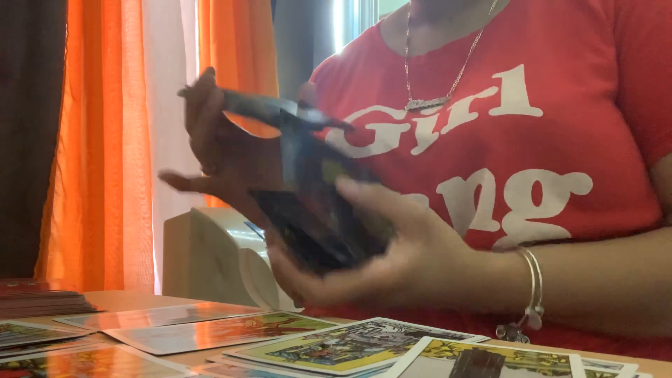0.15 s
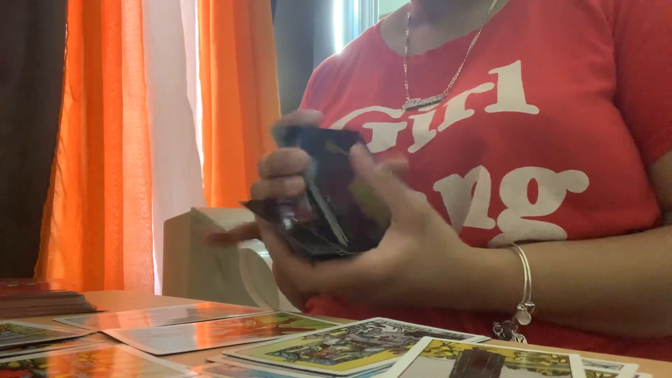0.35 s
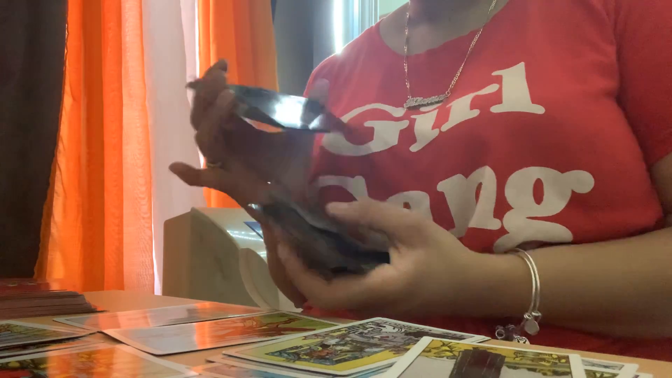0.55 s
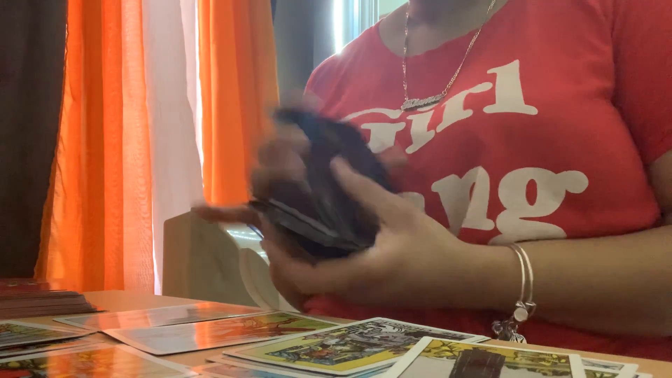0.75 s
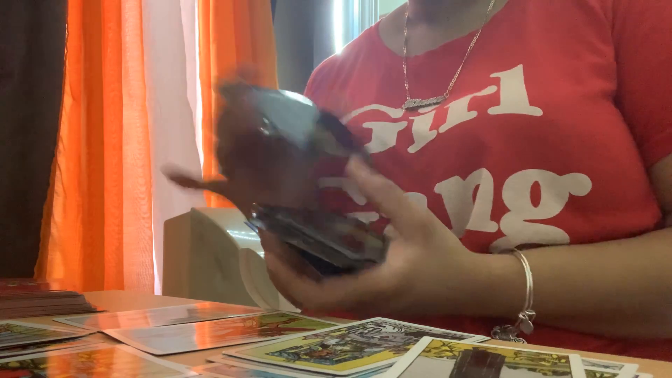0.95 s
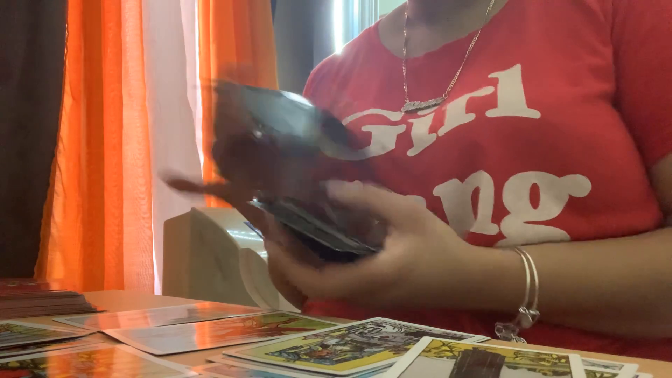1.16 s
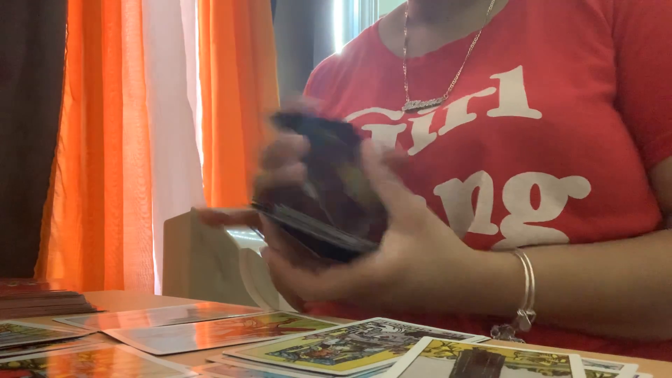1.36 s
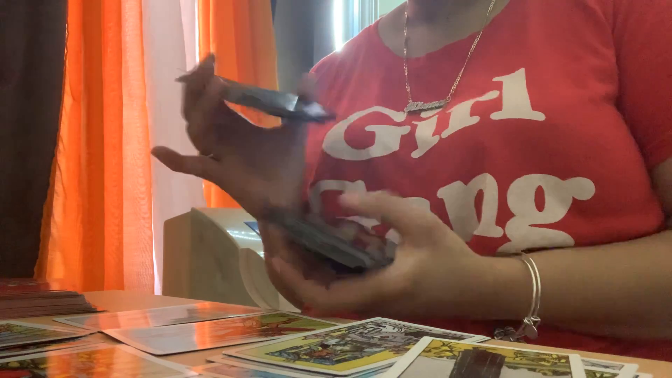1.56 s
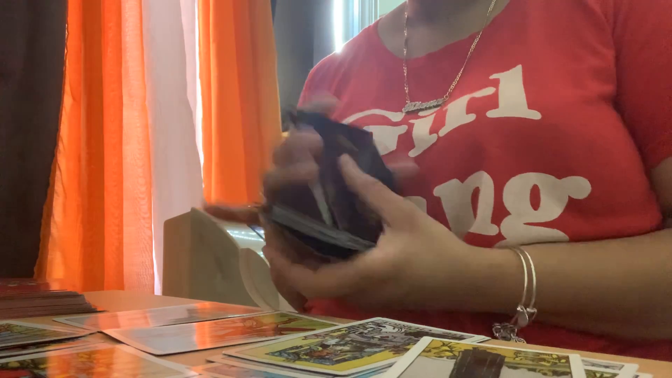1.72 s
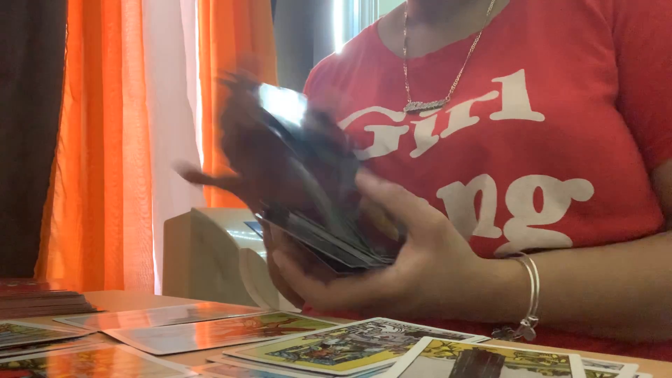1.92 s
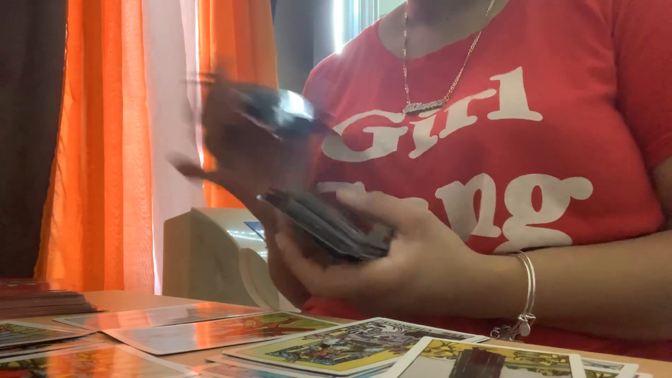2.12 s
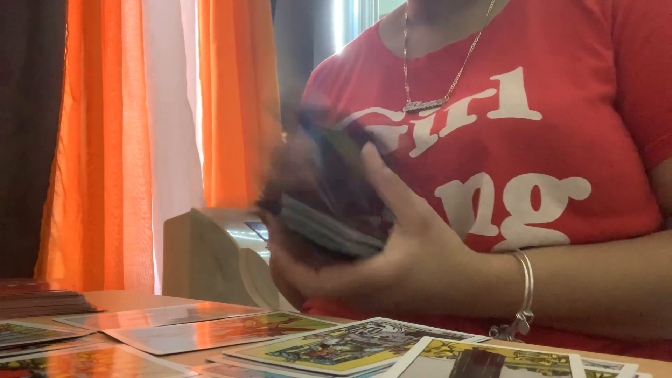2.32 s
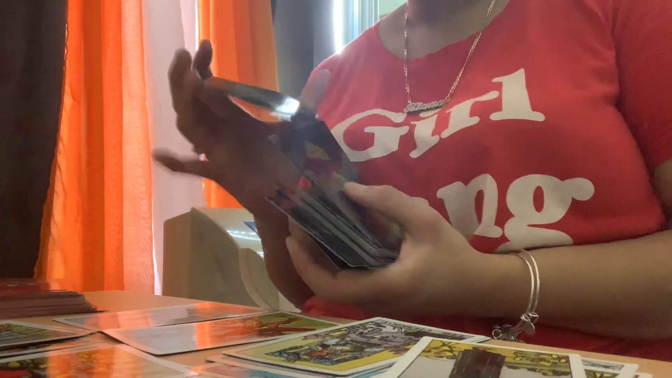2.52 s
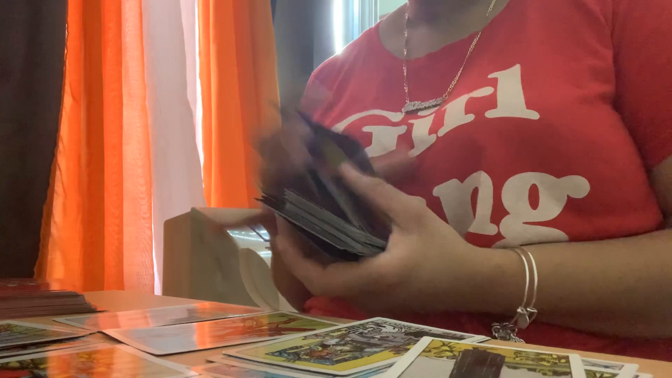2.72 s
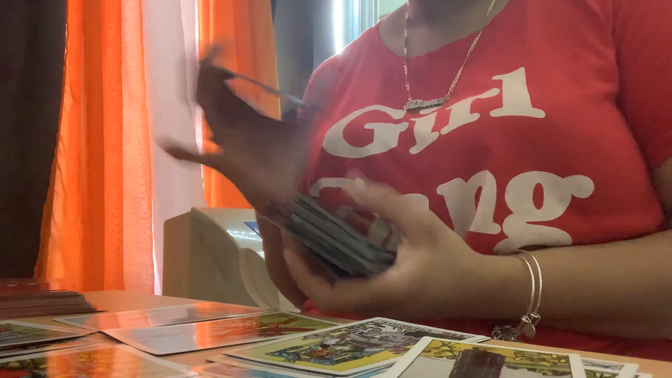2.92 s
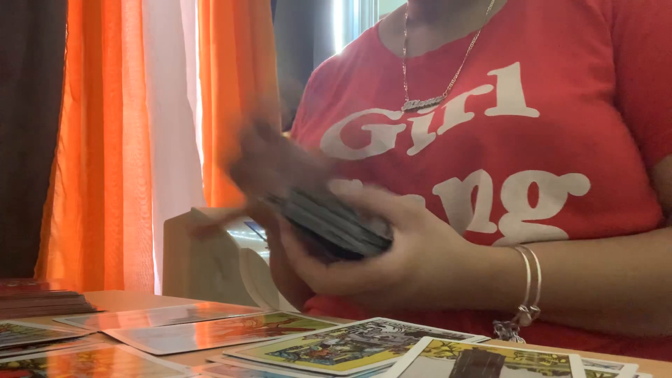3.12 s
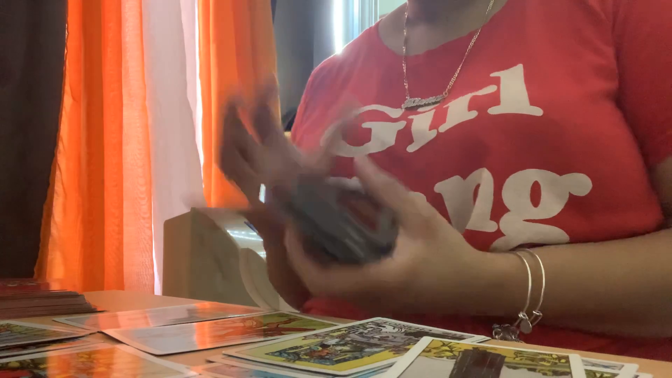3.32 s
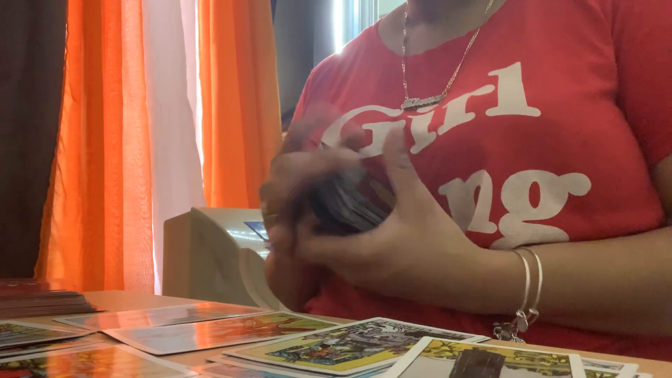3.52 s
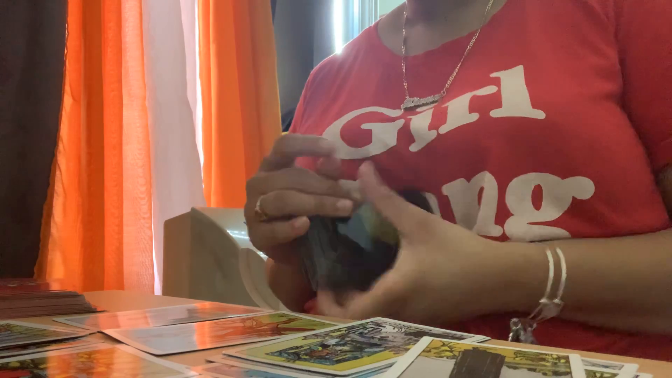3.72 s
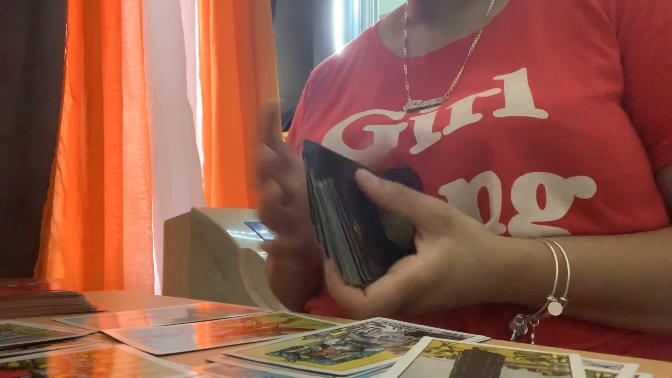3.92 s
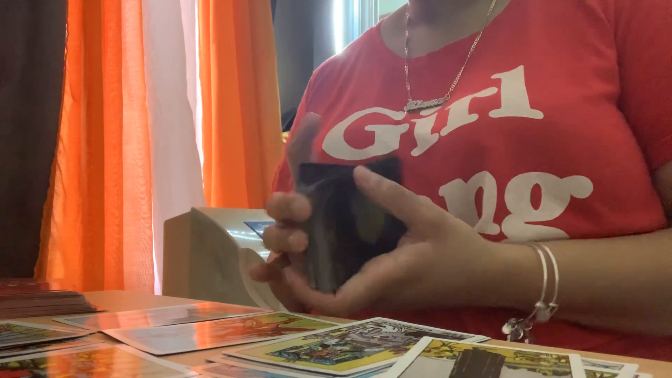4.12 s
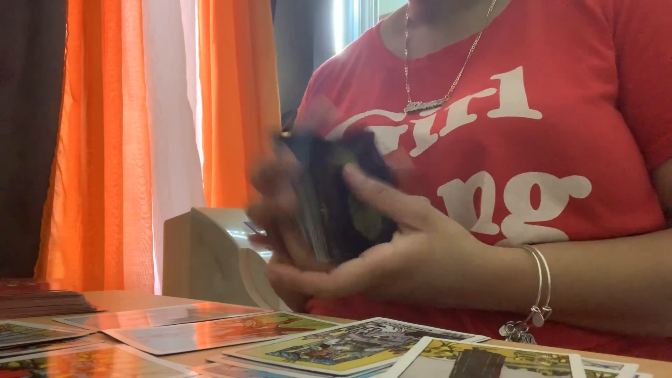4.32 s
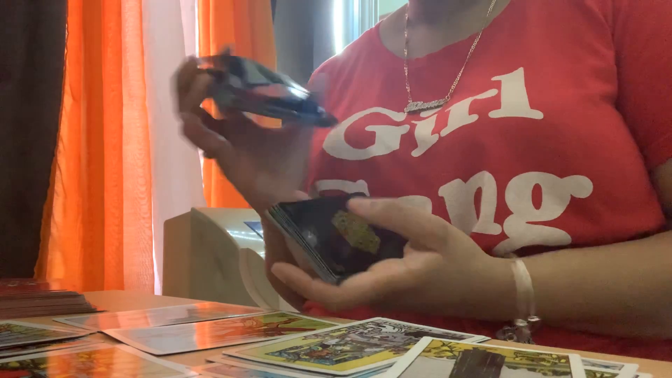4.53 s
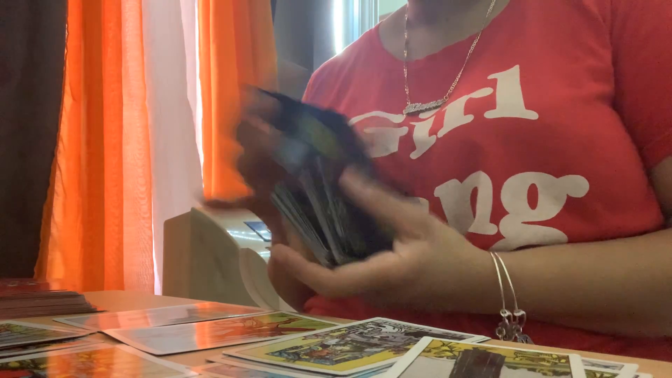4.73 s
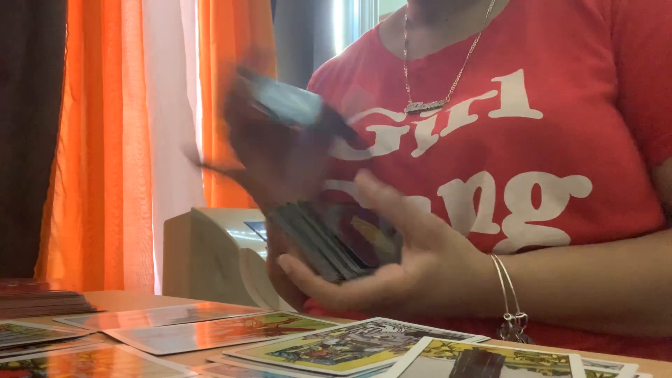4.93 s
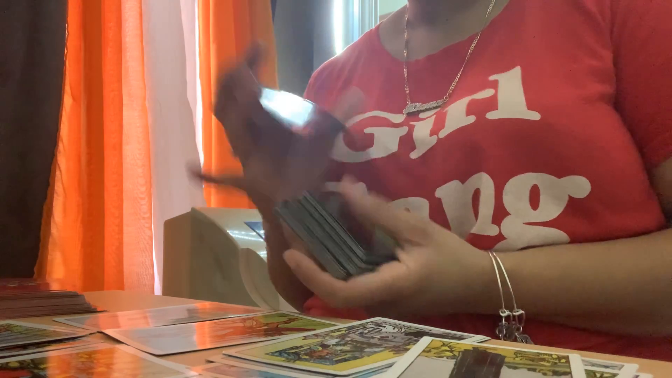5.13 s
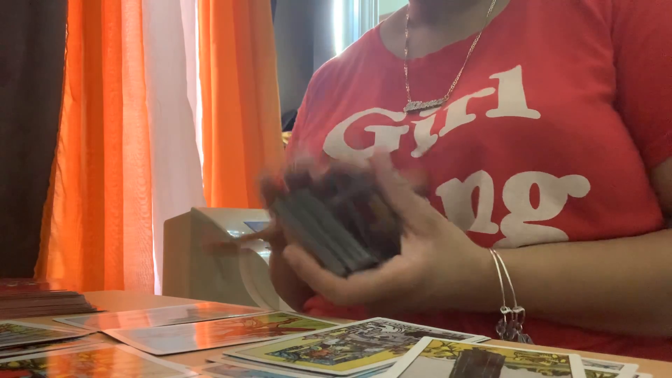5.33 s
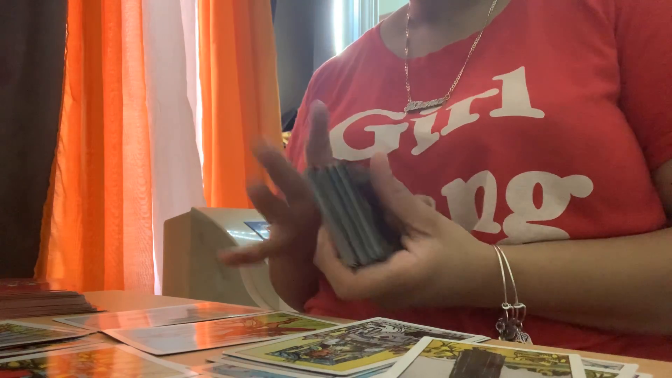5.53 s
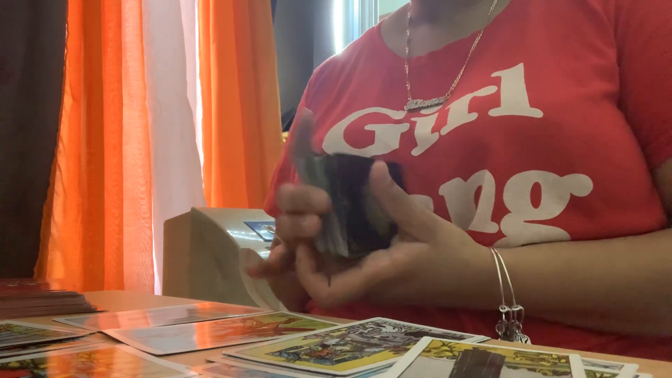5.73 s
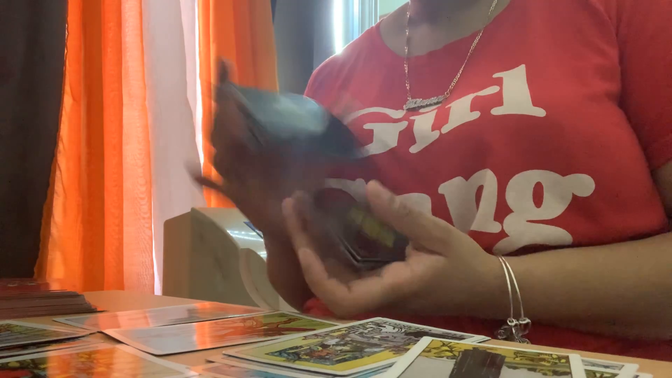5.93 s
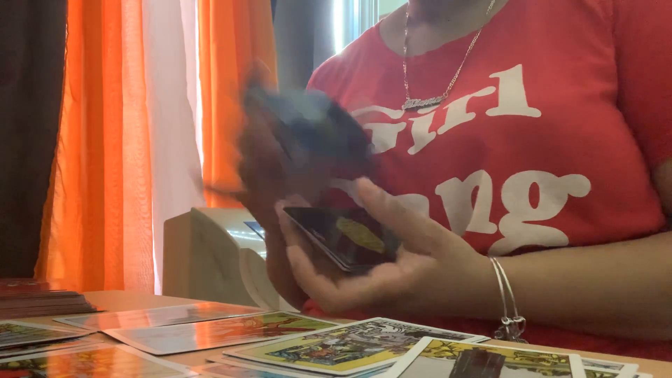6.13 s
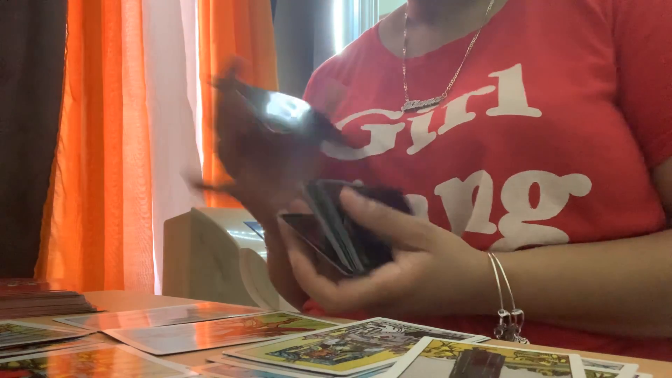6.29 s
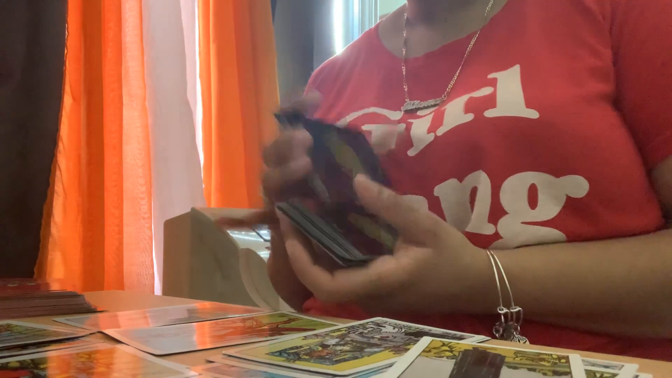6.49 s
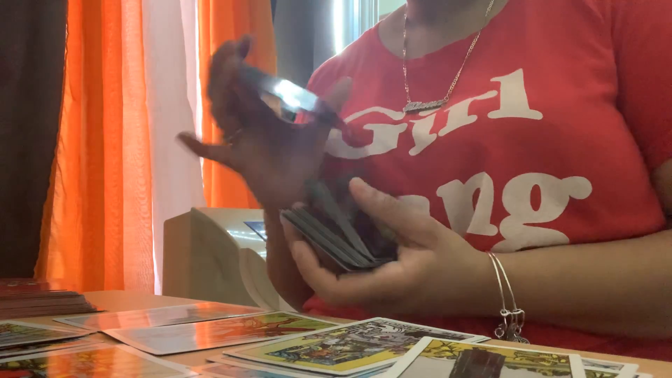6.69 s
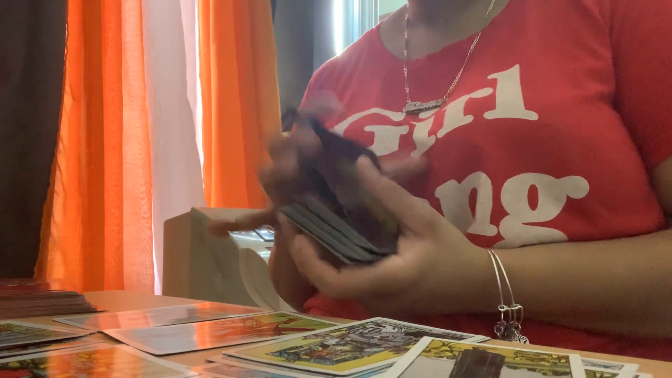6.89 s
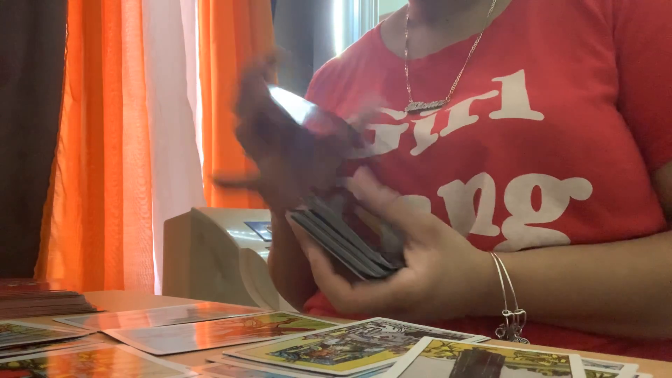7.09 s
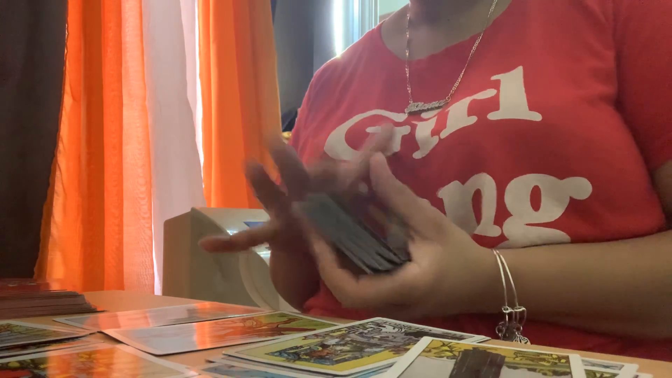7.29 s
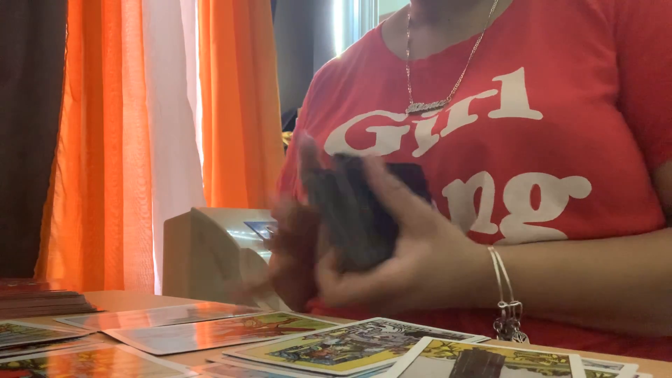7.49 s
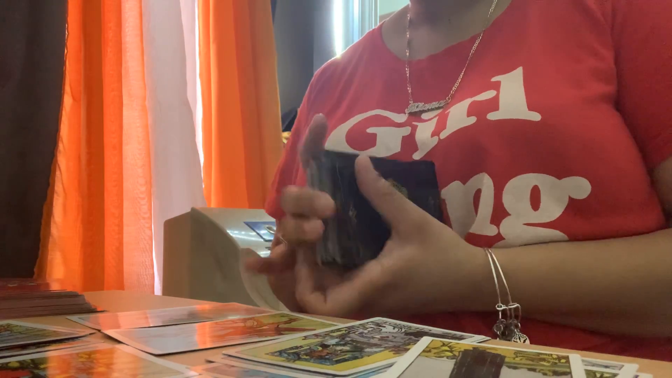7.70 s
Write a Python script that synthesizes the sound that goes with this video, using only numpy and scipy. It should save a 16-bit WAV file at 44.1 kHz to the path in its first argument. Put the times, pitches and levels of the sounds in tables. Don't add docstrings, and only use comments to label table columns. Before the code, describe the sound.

Irregular overhand shuffling, heard close and dry with a short indoor tail. First comes a busy, louder run of gritty slides, sharp card slaps and woody knocks that ring for an instant. The hands then slow, leaving faint ticks and rubs. A sparser second round brings clicks, snaps and lighter slaps, fading to small rustles. Soft arm rumble and steady faint hiss lie underneath.

```python
import sys
import numpy as np
from scipy import signal
from scipy.fft import rfft, irfft
from scipy.io import wavfile
from scipy.ndimage import uniform_filter1d

SR = 44100
rng = np.random.default_rng(int(sys.argv[2]) if len(sys.argv) > 2 else 0)


def master(y):
    cut = np.clip(np.atleast_2d(y).T, -1, 1)
    pcm = np.round(cut * 32767)
    wavfile.write(sys.argv[1], SR, pcm.astype(np.int16))


def ratio(d):
    e = np.asarray(d, float) / 20
    return 10 ** e


N = 341775

# frequency in Hz, level in dB per Hz.
CRACK_SPECTRUM = [(1500, -6), (3000, 3), (5000, -1.5), (8000, -7), (12000, -13), (16000, -7.5)]


def rms_one(x):
    return x / np.sqrt(np.mean(x ** 2) + 1e-20)


def at_hz(points, hz):
    points = np.array(points)
    return np.interp(np.log(hz), np.log(points[:, 0]), points[:, 1])


def coloured(x, spectrum):
    hz = np.arange(len(x) // 2 + 1) * SR / len(x) + 1
    return irfft(rfft(x) * ratio(at_hz(spectrum, hz)), len(x))


def band(x, low_hz, high_hz):
    return signal.sosfilt(signal.butter(2, [low_hz, high_hz], "band", fs=SR, output="sos"), x)


def drift(rate_hz):
    r = np.exp(-2 * np.pi * rate_hz / SR)
    return rms_one(signal.lfilter([1], [1, -2 * r, r * r], rng.standard_normal(N)))


def burst(t, touch_s):
    return t / touch_s * np.exp(1 - t / touch_s)


def falling(t, hz, fall, settle_s):
    return np.sin(2 * np.pi * hz * (t + fall * settle_s * (1 - np.exp(-t / settle_s))))


def add_at(out, start_s, sound):
    start = round(start_s * SR)
    out[start:start + len(sound)] += sound


def hands(t):
    # share of the stroke 0-1, rasp in dB re peak, flexing in dB re rasp,
    # sheen in dB re the stroke's own.
    drop_shape = [(0, -25, 0.5, -7), (.55, 2, -26.5, 0), (1, -5, -13.5, 4.5)]
    push_shape = [(0, -18, -4.5, -3), (.5, -11, -13.5, 5), (1, -1, -11.5, -1.5)]
    glide_shape = [(0, -17, -4.5, -2.5), (.3, -6, -16, -0.5), (1, 1.5, -16, -0.5)]
    rub_shape = [(0, -11, 2, 0.004), (.55, -1, -16.5, 0.00093), (1, -12.5, 0.5, 0)]
    settle_shape = [(0, -3.5, 11.5, 0.014), (.4, -2.5, -4, 0), (1, -9, 2, 0)]
    fan_shape = [(0, -2, -2, 1.5), (.5, 2, -16, -2.5), (1, -6.5, -11, -5)]
    long_shape = [(0, -15, -3.5, -12), (.3, 2, -31, -3), (1, -0.5, -17.5, 0.5)]
    # start and end in seconds, peak rasp in dB,
    # resonance of the air gap between packets in Hz, sheen of the coating in dB re rasp.
    drops = [
        (0.772, 0.8515, -38, 5940, -2),
        (1.082, 1.183, -37.5, 5360, -1),
        (2.719, 2.781, -36.5, 5500, 0.5),
    ]
    pushes = [(1.357, 1.435, -61.5, 4759, -4), (1.44, 1.501, -40, 5330, 8), (1.692, 1.733, -52, 3400, -7),
              (1.801, 1.809, -36, 5160, 4.5), (4.374, 4.407, -49, 2470, -13.5), (4.99, 5.037, -59, 3100, 1),
              (5.328, 5.348, -48.5, 2500, -1), (6.176, 6.218, -57.5, 5083, 3)]
    glides = [(4.285, 4.385, -59.5, 2600, 1.5), (2.597, 2.68, -50, 3100, -11),
              (3.42, 3.478, -63.5, 2700, -7.5), (3.5, 3.562, -49.5, 2700, -11),
              (5.805, 5.895, -65, 5000, -3), (0.394, 0.504, -47, 4000, -4), (4.0, 4.8, -64.5, 1400, -1.5),
              (1.73, 1.795, -50, 3600, 7), (4.66, 4.712, -61, 3000, 6.5), (6.505, 6.56, -63.5, 1900, 2)]
    rubs = [(0.006, 0.16, -47.5, 4930, -5), (0.331, 0.393, -46.5, 1820, -16),
            (1.912, 2.014, -45.5, 3000, -10), (2.383, 2.451, -48, 3000, -7),
            (2.694, 2.718, -38.5, 3080, -14), (3.095, 3.148, -38.5, 1910, -5),
            (3.664, 3.763, -51, 2520, -6), (4.21, 4.23, -72, 1590, -5), (4.705, 4.749, -46.5, 2080, -16),
            (4.872, 4.923, -67, 4720, -6), (5.557, 5.646, -65, 4240, -19), (5.682, 5.716, -66.5, 2330, -11),
            (6.875, 6.893, -57, 4000, 2), (6.894, 6.926, -51.5, 3000, -9), (7.465, 7.506, -58.5, 3160, -14),
            (7.529, 7.565, -56, 3080, -6.5), (7.595, 7.68, -57, 3450, -20),
            (7.651, 7.692, -55.5, 4500, -12), (7.687, 7.73, -70.5, 3130, -12),
            (3.343, 3.422, -71.5, 2840, -11.5), (1.027, 1.072, -58.5, 2390, -7)]
    settles = [(0.0, 0.018, -40, 3700, -14), (0.26, 0.313, -54, 1720, -16), (0.515, 0.594, -49, 1600, -20),
               (0.693, 0.734, -50, 3120, -15.5), (1.171, 1.21, -47, 1530, -3),
               (1.498, 1.551, -49.5, 1420, -6), (1.824, 1.893, -49, 2080, -4), (2, 2.034, -44.5, 2330, -6),
               (7.206, 7.252, -47.5, 1850, -8), (3.763, 3.834, -62, 2730, -7),
               (3.917, 3.953, -75, 2320, -25), (4.437, 4.49, -84, 5180, -16.5),
               (4.78, 4.787, -60, 4670, -12.5), (5.351, 5.4, -50.5, 1790, -4.5),
               (5.969, 5.975, -65.5, 1690, -13), (6.97, 6.997, -56.5, 1690, -12),
               (2.351, 2.4, -60, 2410, 1), (3.04, 3.1, -53.5, 3140, -2.5), (0.761, 0.79, -50.5, 5450, -13),
               (3.604, 3.674, -63, 2770, 1), (1.067, 1.094, -46.5, 1590, -15)]
    fans = [(2.437, 2.52, -55, 2360, 4), (3.557, 3.605, -46, 2040, -8), (6.552, 6.636, -51, 3020, -4),
            (5.039, 5.068, -38.5, 5340, 1), (6.223, 6.253, -32, 3050, -6), (6.854, 6.875, -45, 4200, 1.5)]
    longs = [
        (2.057, 2.102, -38, 9000, 0.0067),
    ]
    # shape, strokes, strength of the gap resonance in dB, its slide over the stroke in octaves.
    kinds = [(drop_shape, drops, 2.66, 0.0053), (glide_shape, glides, 7.2, 0.15),
             (push_shape, pushes, 5.0, 0.05), (rub_shape, rubs, 4.4, 0.05),
             (settle_shape, settles, 4.4, -0.05), (fan_shape, fans, 2.9, -0.1), (long_shape, longs, 11, 0.83)]
    release_db_per_s = 697
    strokes = sorted((*row, shape, *gap) for shape, rows, *gap in kinds for row in rows)
    controls = np.zeros((5, len(t))) + [[-120], [0], [0], [3000], [0]]
    for start, end, rasp_db, gap_hz, sheen_db, shape, gap_db, slide in strokes:
        on = t >= start
        share, *columns = np.transpose(shape)
        moments = start + share * (end - start)
        for k, (column, own_db) in enumerate(zip(columns, (rasp_db, 0, sheen_db))):
            controls[k, on] = np.interp(t[on], moments, column) + own_db
        controls[3, on] = gap_hz * 2 ** (slide * np.interp(t[on], [start, end], [-.5, .5]))
        controls[4, on] = gap_db
        controls[0, on] -= release_db_per_s * np.maximum(t[on] - end, 0)
    return controls


def slides(patchy_db=2.5, grit=0.51, gap_octaves=0.27, chatter_db=1.0):
    # frequency in Hz, level in dB per Hz.
    friction_spectrum = [(180, -56), (300, -18.5), (1430, -8), (4370, -5), (7500, -5), (9200, -7),
                         (14500, -3.5), (16000, -7.5)]
    step = 32
    t = np.arange(0, N, step) / SR
    rasp_db, flex_db, sheen_db, gap_hz, gap_db = hands(t)
    grains = (rng.random((2, N)) < 1500 / SR) * rng.standard_normal((2, N)) * 5.4
    friction = rng.standard_normal((2, N)) + grit * grains
    edges = 280 * 2 ** np.arange(0, 6.1, 1 / 4)
    patches = rms_one(uniform_filter1d(rng.standard_normal((len(edges), len(t))), size=30))
    patches = rms_one(uniform_filter1d(uniform_filter1d(patches, size=20), size=3, axis=0))
    out = 0
    for k, (low, high) in enumerate(zip(edges, edges[1:])):
        hz = np.sqrt(low * high)
        dull = at_hz([(900, 0.92), (2600, 0.0082)], hz)
        bright = at_hz([(7000, 0.033), (11000, 0.87)], hz)
        gap = gap_db * np.exp(-(np.log2(hz / gap_hz) / gap_octaves) ** 2)
        db = at_hz(friction_spectrum, hz) + dull * (flex_db + 15.5) + bright * sheen_db
        db = db + gap + patchy_db * patches[k]
        out = out + np.repeat(ratio(db), step)[:N] * band(friction[k % 2], low, high)
    pressure = signal.lfilter([.01], [1, -.99], np.repeat(ratio(rasp_db), step)[:N])
    return out * pressure * ratio(chatter_db * drift(120) + 5.5)


def slaps(touch_ms=1.71):
    # start in seconds, edge crack peak in dB, knock peak in dB,
    # knock pitch in Hz, palm thump peak in dB.
    first_round = [(0.2645, -32.5, -50, 1550, -59), (0.3484, -41, -45.5, 740, -52.5),
                   (0.3655, -29, -44, 930, -51.5), (0.5191, -22.5, -36.5, 765, -43.5),
                   (0.691, -33.5, -44, 1540, -82), (0.7612, -33, -45, 1800, -56),
                   (0.8496, -62, -43.5, 1540, -45), (1.067, -20, -33, 804, -43),
                   (1.1695, -27, -36, 740, -49.5), (1.4135, -31.5, -56, 860, -48),
                   (1.499, -23, -29.5, 758, -36), (1.7231, -29, -56, 680, -45),
                   (1.8125, -16.5, -32, 890, -75), (1.9959, -23, -40.5, 846, -77),
                   (2.3811, -21.5, -51, 730, -44.5), (2.4327, -32, -48, 640, -49),
                   (2.7888, -34.5, -36, 1616, -45.5), (3.0745, -31.5, -45, 1740, -60.5),
                   (3.0906, -19, -44.5, 1590, -72), (3.1417, -41, -38.5, 916, -50),
                   (3.1505, -48, -36.5, 680, -38)]
    loose_round = [(3.5658, -31, -37.5, 851, -73), (3.575, -30, -40, 876, -55),
                   (3.832, -48, -59, 427, -58.5), (4.4214, -49, -63, 688, -82), (4.728, -28, -49, 870, -53),
                   (4.7682, -56, -41, 886, -49), (5.068, -42, -40.5, 1650, -43.5),
                   (5.3503, -25.5, -46, 1950, -60.5), (6.2405, -27, -41.5, 690, -46),
                   (6.6008, -29.5, -52, 1120, -56), (6.981, -34.5, -52, 1630, -71),
                   (7.2089, -27, -39.5, 1850, -48.5), (7.227, -27.5, -44, 1670, -55.5)]
    rows = first_round + loose_round
    t, touch = np.arange(round(.1 * SR)) / SR, touch_ms / 1000
    cracks, knocks = np.zeros((2, N + len(t)))
    noises = rng.standard_normal((len(rows), len(t)))
    for (start, crack_db, knock_db, hz, thump_db), noise in zip(rows, noises):
        add_at(cracks, start, ratio(crack_db - 7.5) * burst(t, 0.72 * touch) * noise)
        knock = burst(t, 0.00076 + 0.95 / hz) * falling(t, hz, fall=0.5, settle_s=0.00077)
        rattle = 1.1 * burst(t, touch) * band(noise, 1400, 3000)
        thump = burst(t, 0.01) * (falling(t, 160, 1.3, 0.0066) + 14.2 * band(noise, 85, 750))
        add_at(knocks, start, ratio(knock_db + 3.5) * (knock + rattle) + ratio(thump_db - 13.5) * thump)
    return coloured(cracks, CRACK_SPECTRUM)[:N] + knocks[:N]


def rings():
    # start in seconds, frequency in Hz, peak in dB, swell in ms.
    modes = [(0.52, 1110, -40.5, 1.7), (1.068, 1190, -39, 1.1), (1.5, 1260, -34, 1.5),
             (1.816, 634, -37, 1.7), (1.843, 840, -46, 2), (3.58, 656, -41.5, 2.9),
             (1.524, 610, -43.5, 2.4), (0.192, 724, -56, 4.0), (1.074, 302, -39, 1.8),
             (3.724, 2060, -55, 2.1), (3.722, 790, -51, 1.3), (0.762, 2200, -47, 1.4),
             (0.264, 2830, -44.5, 1.9), (0.518, 2440, -46, 2.2), (0.850, 657, -44, 2.2),
             (1.0666, 1740, -41, 2), (1.0676, 2750, -38, 0.9), (1.1699, 1600, -28, 1.1),
             (1.1695, 2030, -38, 1.5), (1.4992, 1675, -33, 2), (1.4992, 2530, -44, 1.4),
             (1.511, 680, -41, 2.9), (1.8125, 2210, -29, 0.89), (1.8133, 4250, -27, 0.82),
             (1.812, 5440, -24.5, 0.67), (1.826, 840, -43, 2.5), (1.997, 1664, -40, 2),
             (1.996, 2170, -34.5, 1.2), (2.419, 3290, -34.5, 1.2), (2.788, 880, -39, 1.1),
             (2.788, 2820, -40.5, 1.5), (3.567, 2090, -45.5, 3.4), (3.573, 850, -35.5, 2.8),
             (3.567, 3120, -46.5, 3.8), (5.352, 2860, -50, 1.8), (5.351, 5460, -48, 1.2),
             (5.381, 895, -50, 3.6), (6.221, 2100, -34.5, 0.86), (6.914, 870, -55, 2.9),
             (7.2087, 3190, -51, 1.3), (7.2277, 3200, -47, 1.5), (7.2275, 590, -50, 1.4),
             (3.479, 890, -57.5, 1.8), (2.734, 990, -44, 2.6)]
    t = np.arange(round(.05 * SR)) / SR
    out = np.zeros(N + len(t))
    for start, hz, db, swell_ms in modes:
        add_at(out, start, ratio(db) * burst(t, swell_ms / 1000) * np.sin(2 * np.pi * hz * t))
    return out[:N]


def ticks(touch_ms=1.0):
    # start in seconds, peak in dB, dull part in dB re peak.
    first_round = [(0.0384, -37, -14), (0.3573, -36.5, 1), (0.7548, -36, -10), (1.039, -66.5, 15),
                   (1.0631, -30, -23), (1.396, -41, -14), (2.362, -31, -18.5), (2.4039, -29.5, -19),
                   (2.4168, -22, -18), (2.6724, -32, -12.5), (3.0485, -37, -12)]
    squaring = [(3.721, -44, -10), (3.818, -38.5, -22), (3.8322, -29, -30), (3.9105, -44, -16.5),
                (4.0045, -48.5, -23), (4.0388, -47, -32), (4.0527, -52, -20), (4.076, -39, -27.5),
                (4.2094, -54, -10), (4.394, -35.5, -21), (4.4728, -46, -15.5)]
    loose_round = [(4.7167, -33.5, -3.5), (4.74, -32, -24), (4.7535, -39.5, -2), (5.0442, -25, -10.5),
                   (5.0558, -23, -11), (5.8989, -45, -15.5), (5.966, -45.5, -14), (6.2207, -23.5, -11.5),
                   (6.2647, -19, -21), (6.3495, -45.5, -7.5), (6.561, -36, -8), (6.6194, -32, -22),
                   (6.832, -46, -7.5), (6.8628, -25, -38), (6.916, -52, -17), (6.9485, -34, -22),
                   (6.9528, -30.5, -41), (7.4765, -47, -9), (7.537, -38.5, -29), (6.778, -67, -5),
                   (7.736, -59, -5), (7.553, -46.5, -9)]
    rows = first_round + squaring + loose_round
    firm_db, firm_hz, dulling = -39.5, 12000, 0.65
    t = np.arange(round(.02 * SR)) / SR
    sharp, dull = np.zeros((2, N + len(t)))
    for (start, db, dull_db), noise in zip(rows, rng.standard_normal((len(rows), 2, len(t)))):
        top_hz = min(firm_hz * ratio(dulling * (db - firm_db)), .45 * SR)
        add_at(sharp, start, ratio(db - 9.5) * burst(t, touch_ms / 1000) * band(noise[0], 200, top_hz))
        add_at(dull, start, ratio(db + dull_db + 2.0) * burst(t, 3.9 * touch_ms / 1000) * noise[1])
    return (coloured(sharp, CRACK_SPECTRUM) + band(dull, 500, 3000))[:N]


def flicks(touch_ms=0.62, spread=1.4):
    # start in seconds, peak in dB, centre in Hz.
    snaps = [(0.001, -36, 2500), (0.049, -41, 4000), (0.115, -43, 3000), (0.128, -46, 3780),
             (0.192, -42, 2630), (0.243, -64, 7500), (0.561, -39, 4000), (0.859, -42, 4500),
             (2.782, -34, 2500), (3.051, -47, 4500), (3.746, -47, 5000), (3.860, -55, 3500),
             (4.711, -38, 2500), (5.705, -60.5, 3000), (5.972, -62.5, 5000), (3.1528, -35.5, 2520),
             (0.296, -38, 3020), (0.305, -45, 2500), (0.36, -36, 5030), (0.55, -42, 5000),
             (0.852, -28, 5000), (2.0006, -23.5, 2440), (2.013, -33, 2500), (2.426, -31.5, 2520),
             (2.648, -48, 3190), (4.046, -54.5, 4500), (4.095, -52, 3000), (4.110, -54, 2220),
             (4.154, -71, 3000), (4.224, -60, 2800), (4.241, -67.5, 7030), (5.047, -26, 7050),
             (5.054, -35, 5540), (5.344, -46, 2480), (5.357, -40.5, 3500), (5.361, -44, 4000),
             (5.364, -43, 3000), (5.381, -42.5, 4500), (6.229, -32.5, 2500), (6.244, -32, 5000),
             (6.908, -47, 3030), (6.949, -39, 12500), (6.954, -34.5, 10900), (7.212, -43, 2500),
             (7.2208, -38, 3000)]
    t = np.arange(round(.012 * SR)) / SR
    out = np.zeros(N + len(t))
    for (start, db, hz), noise in zip(snaps, rng.standard_normal((len(snaps), len(t)))):
        snap = rms_one(band(noise, hz / spread, min(hz * spread, .45 * SR)))
        add_at(out, start, ratio(db - 6.5) * burst(t, touch_ms / 1000) * snap)
    return out[:N]


def rough_tones(rows, width_hz):
    out, flutter = np.zeros(N), np.array([drift(width_hz), drift(width_hz)])
    for start, end, from_hz, to_hz, db in rows:
        span = slice(round(start * SR), round(end * SR))
        part = np.linspace(0, 1, span.stop - span.start)
        phase = 2 * np.pi * np.cumsum(from_hz + (to_hz - from_hz) * part) / SR
        tone = flutter[0, span] * np.sin(phase) + flutter[1, span] * np.cos(phase)
        out[span] += ratio(db) * np.sin(np.pi * part ** 0.52) ** .5 * tone
    return out


def squeaks():
    # start and end in seconds, start and end pitch in Hz, level in dB.
    cries = [
        (0.58, 0.604, 12000, 12200, -79),
        (2.805, 2.918, 1620, 1440, -64.5),
        (2.8, 2.917, 7900, 5190, -79.5),
        (4.538, 4.602, 1600, 1700, -71.5),
        (7.252, 7.334, 2000, 2100, -73),
    ]
    return rough_tones(cries, width_hz=130.0)


def chafes():
    # start and end in seconds, start and end pitch in Hz, level in dB.
    whistles = [(0.04, 0.135, 2400, 2810, -59), (0.805, 0.838, 5300, 5150, -42),
                (0.81, 0.85, 8000, 7900, -45), (1.135, 1.163, 5500, 5000, -41),
                (2.062, 2.092, 5700, 5860, -40.5), (2.595, 2.682, 2780, 3550, -62),
                (2.61, 2.655, 5200, 5250, -63), (2.742, 2.782, 5200, 5100, -46.5),
                (3.428, 3.48, 2900, 2490, -66), (3.5, 3.56, 3000, 2850, -69),
                (3.505, 3.56, 4100, 4010, -66), (4.3, 4.37, 2000, 2200, -75), (4.88, 4.92, 5000, 4930, -77),
                (5.555, 5.585, 2400, 2200, -77), (5.87, 5.905, 3500, 3510, -74),
                (7.61, 7.65, 4500, 4000, -67)]
    return rough_tones(whistles, width_hz=310.0)


def room(x, first_wall_ms=4.2):
    # frequency in Hz, T60 in seconds.
    t60 = [(200, 1), (1000, 0.42), (4000, 0.31), (12000, 0.18)]
    # frequency in Hz, time kept in seconds.
    tail_kept = [(500, 0.12), (3000, 0.14), (12000, 0.63)]
    t = np.arange(round(.45 * SR)) / SR
    edges, white = 120 * 2 ** np.arange(0, 7.6, .5), rng.standard_normal((2, len(t)))
    tail = 0
    for k, (low, high) in enumerate(zip(edges, edges[1:])):
        decay = ratio(-60 * t / at_hz(t60, low))
        swallowed = np.exp(-(t / at_hz(tail_kept, low)) ** 3.7)
        tail = tail + band(white[k % 2], low, high) * decay * swallowed
    tail = tail * (1 - np.exp(-(1000 * t / first_wall_ms) ** 2))
    return signal.fftconvolve(x, tail / np.linalg.norm(tail))[:N]


def ambience(hiss_db=-70.5):
    # frequency in Hz, level in dB per Hz.
    hum_and_hiss = [(18, -44), (30, -27.5), (58, 3), (86, -0.5), (364, -14.5), (1350, -23), (5170, -32.5),
                    (15000, -39.5)]
    # time in seconds, level in dB.
    movement = [(0.0, -44), (0.04, -69.5), (1.04, -67), (1.08, -56), (1.29, -70), (1.53, -58),
                (2.29, -70.5), (2.39, -57), (2.55, -67.5), (2.85, -63), (2.98, -95), (3.06, -59.5),
                (3.5, -79), (3.54, -69), (7.19, -75.5), (7.23, -60), (7.38, -86), (7.75, -77)]
    hiss = ratio(hiss_db) * rms_one(coloured(rng.standard_normal(N), hum_and_hiss))
    hiss = signal.sosfilt(signal.butter(8, 14000, fs=SR, output="sos"), hiss)
    white = rng.standard_normal((2, N))
    rumble = rms_one(band(white[0], 54, 75)) + 1.12 * rms_one(band(white[1], 73, 135))
    seconds, db = np.transpose(movement)
    rumble_db = np.interp(np.arange(N) / SR, seconds, db) - 2.5 + 1.7 * drift(2.8)
    return hiss + ratio(rumble_db) * rumble


def scene():
    cards = slides() + ticks() + flicks() + squeaks() + chafes()
    landings = slaps()
    body = rings()
    tail = ratio(-12) * room(cards + ratio(-5) * landings + ratio(-12) * body)
    return (cards + landings + body + tail + ambience())[None]


def roll_off(x):
    return signal.sosfilt(signal.butter(12, 16820, fs=SR, output="sos"), x)


def record(dry):
    cut = signal.sosfilt(signal.cheby1(10, .5, 15800, fs=SR, output="sos"), dry)
    cut = .985 * cut + .015 * dry
    mix = signal.sosfilt(signal.butter(2, 32, "high", fs=SR, output="sos"), cut)
    return roll_off(mix)


dry = scene()
out = record(dry)
master(out)
```